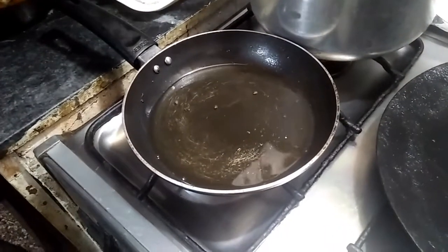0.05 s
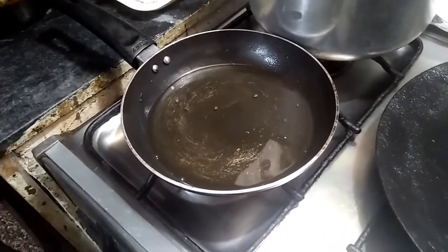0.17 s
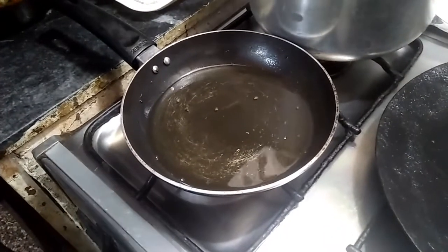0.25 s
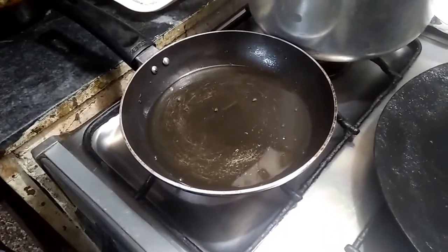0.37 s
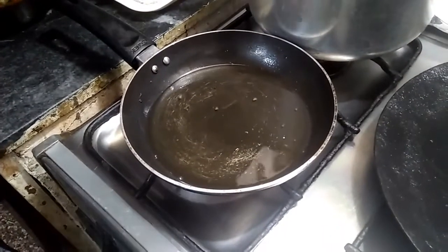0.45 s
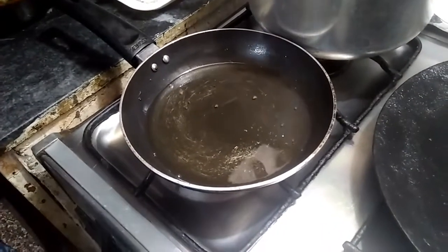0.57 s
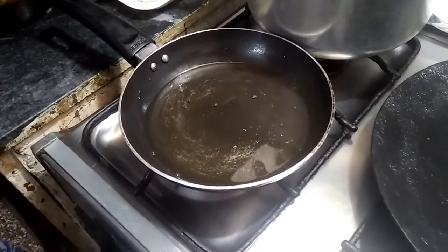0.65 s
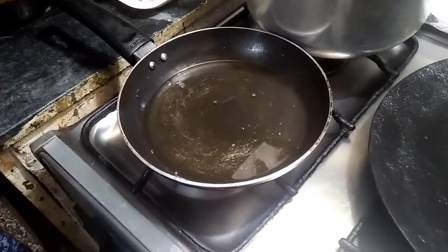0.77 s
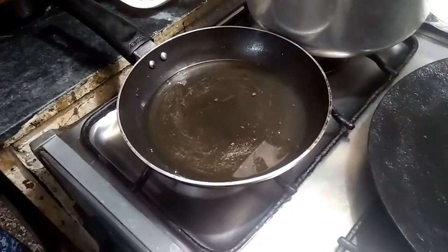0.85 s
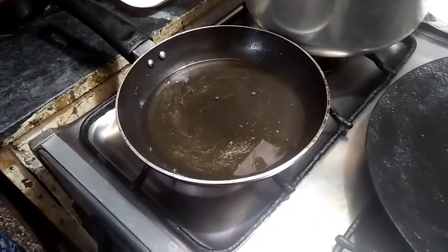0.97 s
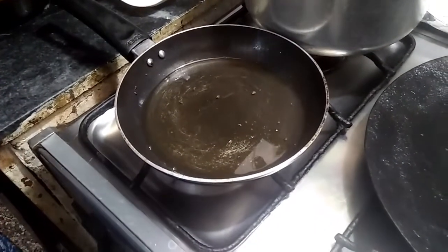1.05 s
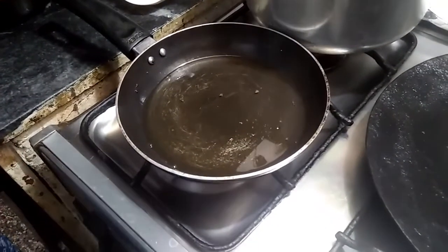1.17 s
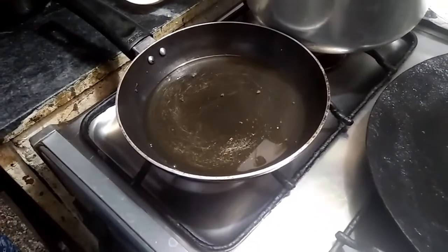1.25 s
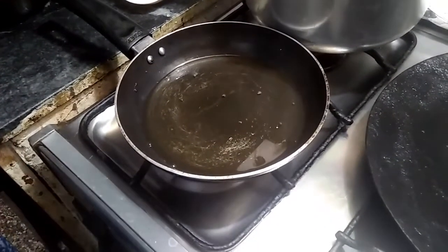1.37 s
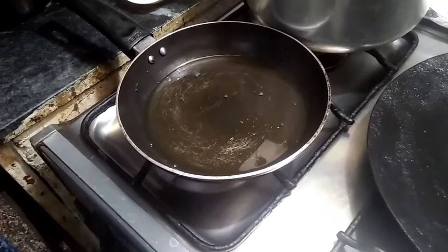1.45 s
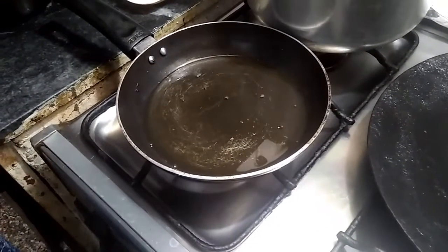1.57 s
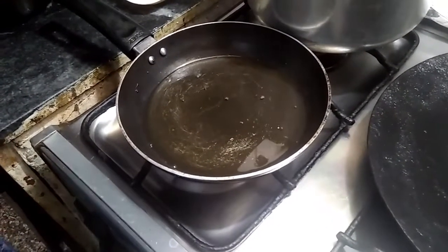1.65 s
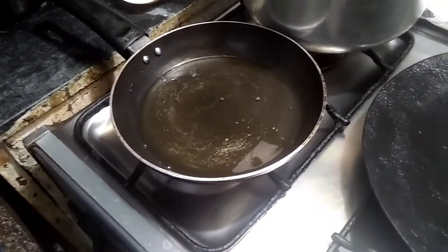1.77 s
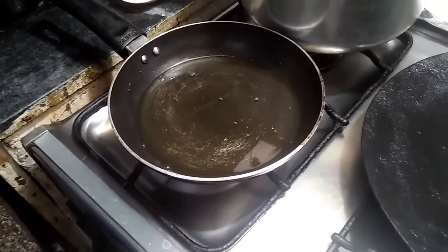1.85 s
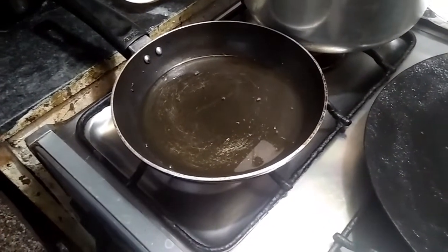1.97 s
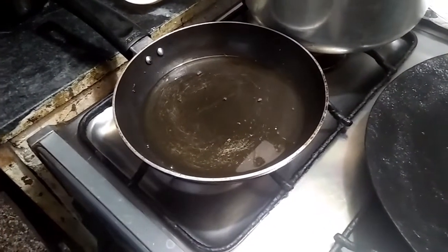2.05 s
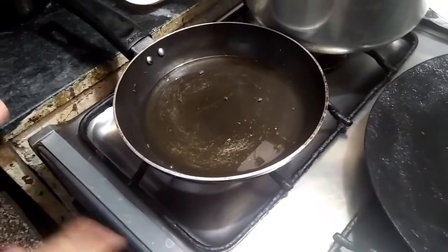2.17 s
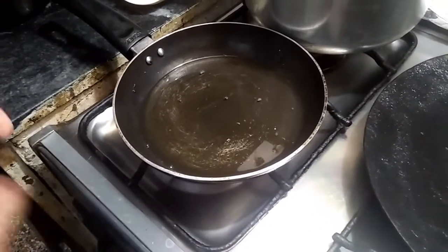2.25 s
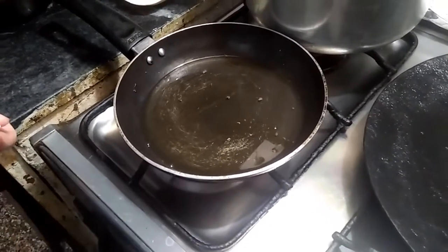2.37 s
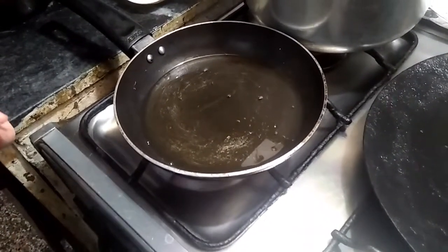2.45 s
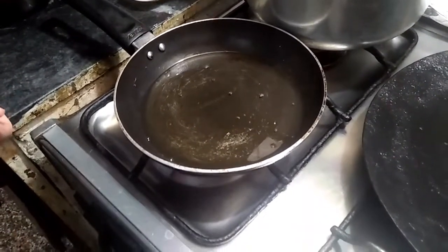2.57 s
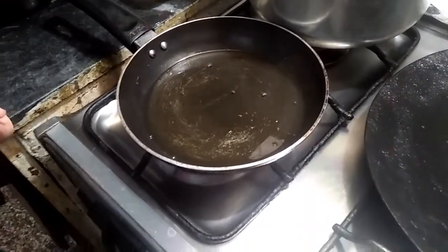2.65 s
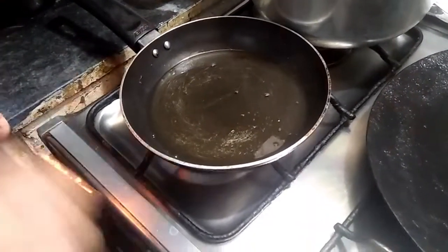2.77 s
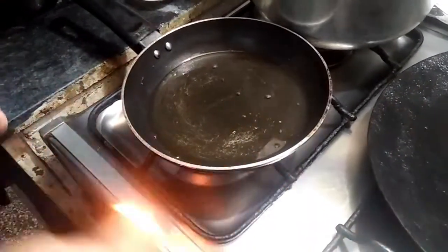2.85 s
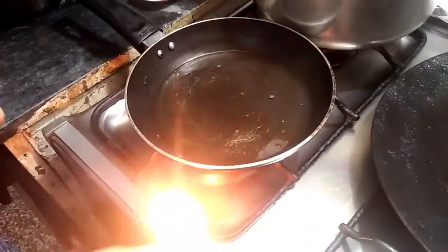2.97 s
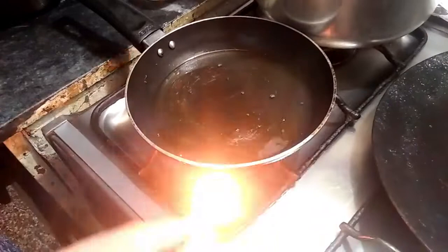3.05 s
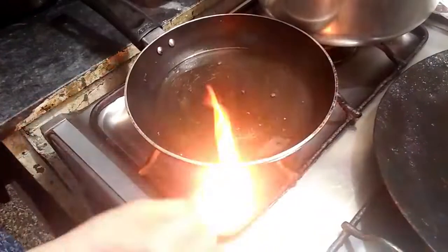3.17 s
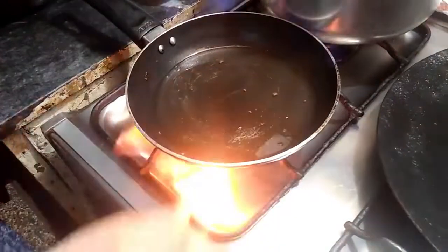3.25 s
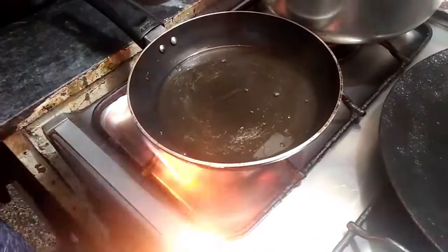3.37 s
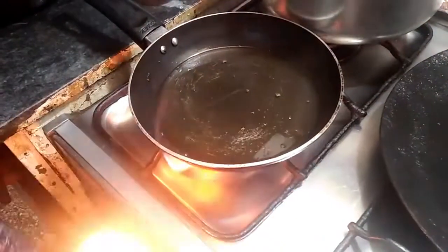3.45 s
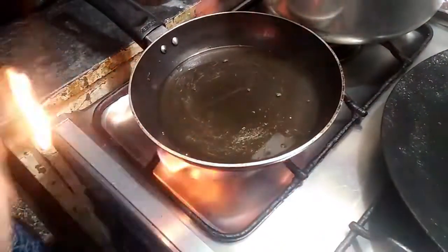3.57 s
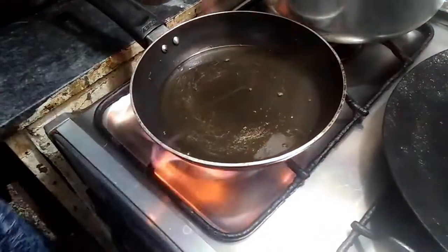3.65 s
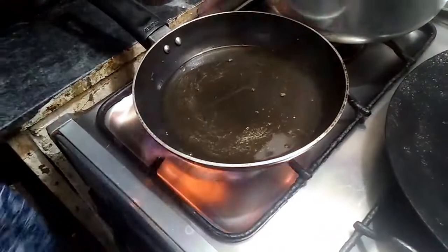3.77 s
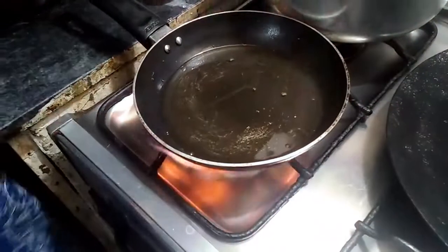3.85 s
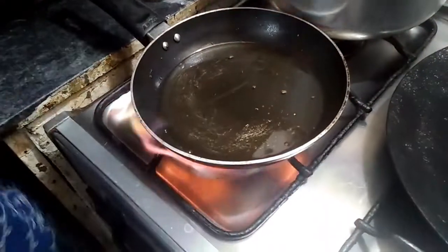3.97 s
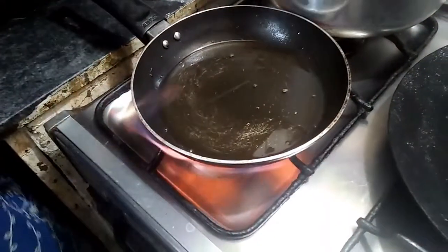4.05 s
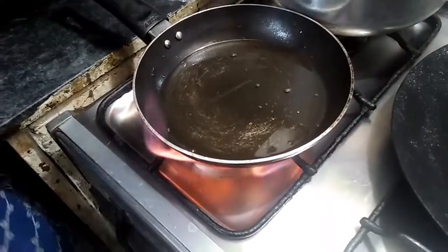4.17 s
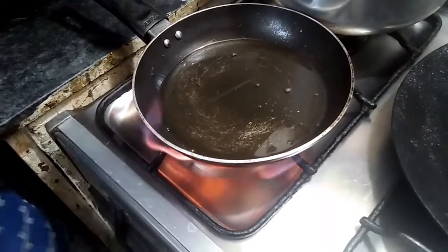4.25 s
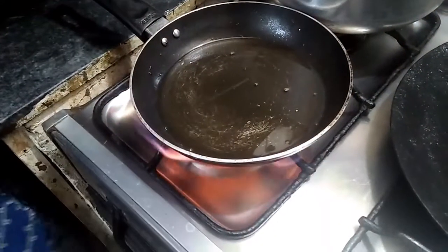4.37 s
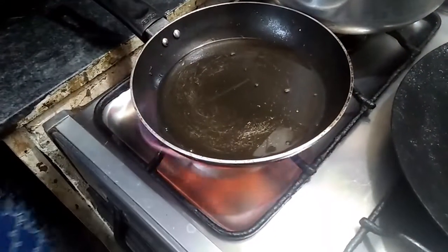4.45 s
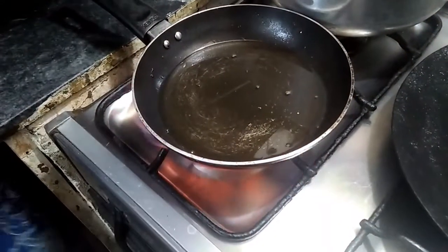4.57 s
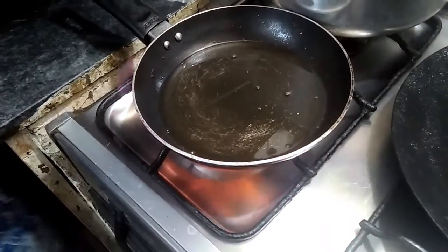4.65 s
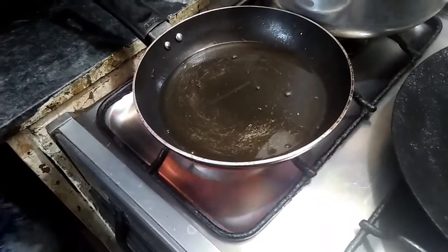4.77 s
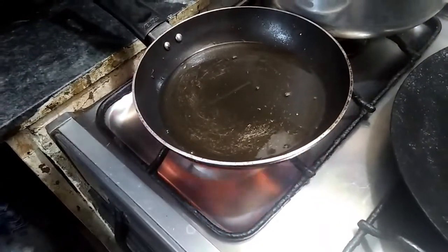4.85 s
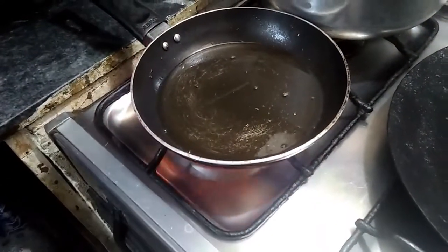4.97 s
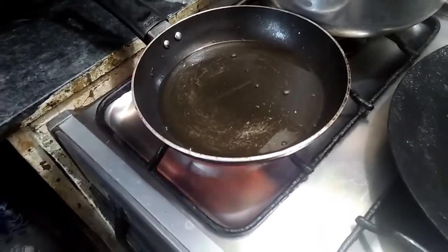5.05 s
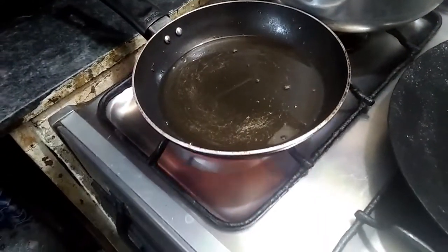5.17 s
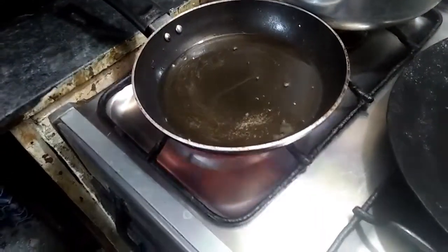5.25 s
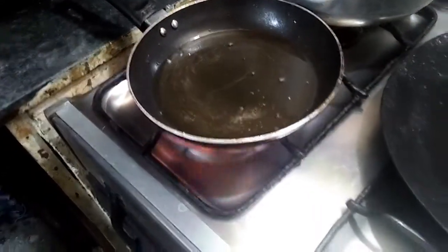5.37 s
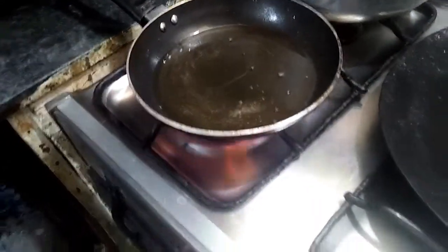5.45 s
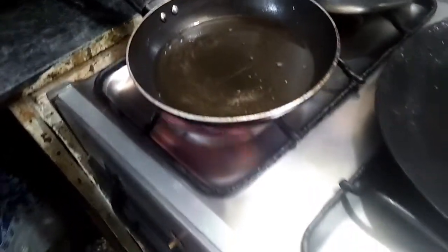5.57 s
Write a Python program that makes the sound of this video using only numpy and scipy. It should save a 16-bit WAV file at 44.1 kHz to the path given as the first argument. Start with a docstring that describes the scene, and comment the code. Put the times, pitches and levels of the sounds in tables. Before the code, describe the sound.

Matches clatter lightly in a card box, then a pause with faint dull bumps. Gas rushes from the burner, a match snaps sharply along the striker and sputters, and a short, boomy ignition puff dominates. Afterwards only quiet fluttering flame, faint hiss, gritty footsteps and low room hum remain, heard by a close microphone in a small kitchen.

```python
"""Small kitchen, microphone just above the stove: a gas burner is lit with a match under a frying pan.
A matchbox slides and rattles (slipping grains, ringing contacts), and dull bumps come from knob and stove.
Gas hisses through a resonant mixing tube, a match judders along the striker and its head fizzes.
The gas catches with a whump of low modes and burns on as fluttering noise.
Soles scuff and tap on the floor; faint room air and a low hum lie beneath."""
import sys
import numpy as np
from scipy import signal
from scipy.fft import rfft, irfft
from scipy.io import wavfile
from scipy.ndimage import uniform_filter1d, map_coordinates

SR = 44100
rng = np.random.default_rng(int(sys.argv[2]) if len(sys.argv) > 2 else 0)


def unload_wav(signal):
    """Save mono or channel-first audio to the path in sys.argv[1] as 16-bit WAV at rate SR, clipped to [-1, 1]."""
    wavfile.write(
        sys.argv[1],
        SR,
        np.round(np.clip(np.atleast_2d(signal).T, -1, 1) * 32767).astype(np.int16),
    )


N = 247401
TIME = np.arange(N) / SR

# puffs of igniting gas and match flame: t/s, level/dB, rise/s, decay/s, flame front over low modes/dB
PUFFS = [(2.857, -45.5, 0.0087, 0.042, 6.5), (3.229, -42, 0.005, 0.027, -10),
         (3.319, -20, 0.049, 0.017, -6.5), (3.376, -27, 0.012, 0.021, -6),
         (3.42, -46.5, 0.052, 0.074, -1.5)]
# low modes of the space under the pan and of the room: f/Hz, relative level/dB
WHUMP_MODES = [(50, -4), (65, 6.5), (96, -5), (124, 3), (147, 3.5), (192, -7), (280, -5.5)]
# spectrum of the flame front: f/Hz, relative level per Hz/dB
FRONT_SPECTRUM = [(170, -12), (270, -2), (360, -8), (450, -3), (650, -4), (850, -10), (1050, -6),
                  (1250, -14.5), (1500, -8), (1900, -32), (3000, -29.5), (6000, -41.5)]
# spectrum of the steady flames: f/Hz, relative level per Hz/dB
FLAME_SPECTRUM = [(24, -50), (40, 4), (149, -9), (232, -15.5), (312, -20), (371, -33), (567, 6),
                  (1030, -4.5), (1200, -2.5), (1700, -1), (2210, -74), (3740, -120)]


def fire():
    """Pooled gas burns in expanding puffs that drive low modes, then the ring of flames flutters on."""
    low = np.zeros(N)
    for hz, db in WHUMP_MODES:
        # turbulence keeps shifting the phase of each mode
        phase = 2 * np.pi * (hz * TIME + rng.random()) + 0.66 * walk(25)
        low += undb(db) * np.sin(phase)
    low = unit(low)
    front = colour(grains(rate=6400, spread_db=7.0), FRONT_SPECTRUM)
    puffs = np.zeros(N)
    for start, db, rise, decay, front_db in PUFFS:
        puffs += undb(db) * burst(start, rise, decay) * (low + undb(front_db) * front)
    flutter = undb(-64.5 + 1.5 * walk(20))
    lit = np.clip((TIME - 3.36) / 0.1, 0, 1)
    return puffs + colour(noise(), FLAME_SPECTRUM) * flutter * lit


# resonances of the burner's mixing tube: f/Hz, nominal width/Hz, relative level/dB
TUBE = [(140, 39, -23.5), (301.4, 50, -21.5), (494, 62, -27.5), (692, 220, -15), (978, 103, -8),
        (1373, 100, -15.5), (1847, 186, -2), (2073, 119, 1.5), (2230, 120, -4), (2530, 143, -8.5),
        (2796, 170, -12.5), (3229, 130, -14.5), (6010, 720, -31), (8440, 760, -28.5), (9800, 2600, -37),
        (11680, 130, -26.5), (13000, 3400, -47.5)]
VALVE_S, VALVE_OPENING_S = 1.862, 0.047
# the hiss holds with a slight sag, then sinks to a low level after the match is struck
JET_DB, JET_SAG_DB_PER_S = -37.35, 1.57
JET_SINKS_S, JET_SINKING_S, JET_LOW_DB = 2.96, 0.57, -55.35


def gas():
    """The jet's turbulence rings the mixing tube; the hiss sinks to a low level after the match is struck."""
    darker = np.clip((TIME - 3.35) / 0.5, 0, 1)  # the balance of the hiss tilts towards the low resonances
    tube = np.zeros(N)
    for hz, width, db in TUBE:
        tilt_db = -3 * (hz > 4000) + 4.8 * (hz < 1500)
        gain_db = db + 0.23 * walk(23) + darker * tilt_db
        tube += undb(gain_db) * resonate(noise(), hz, width)
    valve = np.clip((TIME - VALVE_S) / VALVE_OPENING_S, 0, 1) ** 1.23
    sunk = np.clip((TIME - JET_SINKS_S) / JET_SINKING_S, 0, 1)
    open_db = JET_DB - JET_SAG_DB_PER_S * (TIME - VALVE_S)
    jet_db = (1 - sunk) * open_db + sunk * JET_LOW_DB
    return unit(tube) * valve * undb(jet_db + 0.5 * walk(25))


# burning match head: t/s, fizz level/dB
FIZZ = [(2.92, -42), (3.022, -53), (3.176, -49.5), (3.284, -57), (3.396, -47), (3.404, -56), (3.464, -63.5),
        (3.498, -54.5), (3.752, -60.5), (3.97, -80.5)]
# spectrum of the sputtering head: f/Hz, relative level per Hz/dB
FLARE_SPECTRUM = [(6500, -12), (7600, -7.5), (9000, 1.5), (10200, 0), (11300, -2), (12500, -7.5),
                  (14500, -15)]
# spectrum of the hot gas rushing out: f/Hz, relative level per Hz/dB
RUSH_SPECTRUM = [(4000, -14), (4600, 5), (5100, 3), (6300, 2), (7200, 5.5)]
# hot gas against the fizz: strongest when the whole head is alight
RUSH_DB, RUSH_PEAK_S, RUSH_FADE_DB_PER_S = -3, 3.19, 19.5


def match_flare():
    """The head burns off in a sputtering fizz while jets of hot gas rush from it."""
    fizz = colour(grains(rate=22000, spread_db=2.0), FLARE_SPECTRUM) * undb(1.6 * walk(44))
    rush_db = RUSH_DB - RUSH_FADE_DB_PER_S * np.abs(TIME - RUSH_PEAK_S) + 2.2 * walk(40.2)
    rush = colour(noise(), RUSH_SPECTRUM) * undb(rush_db)
    return shifting((fizz + rush) * fader(FIZZ), share=0.29, lag_s=0.0006, rate=11.0)


# modes of the gripped box and the stick: f/Hz, level/dB, t60/s
GRIPPED_MODES = [(1070, -19.5, 0.013), (1350, -8.5, 0.041), (1740, -4, 0.033), (1757, 4, 0.021),
                 (2014, 3, 0.025), (2740, -5.5, 0.013), (9200, -24.5, .035), (9540, -15, 0.085)]
# spectrum of the grit sprayed off the striker: f/Hz, relative level per Hz/dB
STRIKER_SPECTRUM = [(1000, -1), (2500, -5), (4000, -11.5), (6000, -6.5), (7700, 0.5), (8500, 1.5),
                    (9500, 6.5), (10500, -5), (12500, -3), (14500, -2)]
STRIKE_S, SLIP_GAP_S, BITE_AFTER_S = 2.8502, 0.0025, 0.0062  # the hardest bite follows the first touch
KNOCK_DB, KNOCK_RISE_DB_PER_S, KNOCK_FALL_DB_PER_S = -8.5, 600, 2600
SPRAY_DB, SPRAY_FALL_DB_PER_S = -17.5, 650
CRACK_DB, CRACK_DECAY_S = -13.5, 0.007  # card crushed by the hardest bite


def strike():
    """The match head judders across the striker; each slip knocks the gripped box and sprays grit."""
    knocks, spray = np.zeros(N), np.zeros(N)
    for k, jitter in enumerate(rng.uniform(-1, 1, size=10)):
        after = SLIP_GAP_S * (k + 0.12 * jitter)
        rising_db = KNOCK_RISE_DB_PER_S * (BITE_AFTER_S - after)
        falling_db = KNOCK_FALL_DB_PER_S * (after - BITE_AFTER_S)
        knocks[int((STRIKE_S + after) * SR)] += undb(KNOCK_DB - max(rising_db, falling_db))
        spray_gain = undb(SPRAY_DB - SPRAY_FALL_DB_PER_S * after)
        spray += spray_gain * burst(STRIKE_S + after, rise=0.00021, decay=0.0039)
    age = TIME[:SR // 8]
    ring = np.zeros(len(age))
    for hz, db, t60 in GRIPPED_MODES:
        ring += undb(db) * np.sin(2 * np.pi * hz * age) * np.exp(-np.log(1000) * age / t60)
    ring *= 1 - np.exp(-age / 0.0021)  # card takes a moment to get moving
    crack = undb(CRACK_DB) * burst(STRIKE_S, BITE_AFTER_S, CRACK_DECAY_S) * box_ring(noise())
    return signal.fftconvolve(knocks, ring)[:N] + crack + spray * colour(noise(), STRIKER_SPECTRUM)


# resonances of the matchbox: f/Hz, nominal width/Hz, relative level/dB
BOX = [(1207, 156, -2.5), (1680, 306, -2.5), (1895, 315, -1), (2384, 180, -6)]


def box_ring(slips):
    """The hollow matchbox resonates when shaken by slips."""
    return unit(sum(undb(db) * resonate(slips, hz, width) for hz, width, db in BOX))


# pushes of the matchbox tray: t/s, rise/s, hold/s, t60/s, rasp level/dB, box resonance level/dB
SLIDES = [(0.075, 0.028, 0.11, .1, -58.5, -56), (0.172, 0.01, 0.11, 0.22, -43, -43.5),
          (0.45, 0.019, .05, .1, -65, -60.5), (0.520, 0.013, 0.039, 0.12, -50, -49.5),
          (0.696, 0.03, 0.069, 0.14, -42.5, -47), (0.812, 0.011, 0.033, .13, -54.5, -46),
          (2.095, 0.047, .06, 0.34, -42.5, -36.5)]
# matches knocking in their box: t/s, level/dB, treble over knock/dB, length/s, ring f/Hz
RATTLES = [(0.055, -53.5, -13, .004, 1730), (0.144, -45.5, -12, 0.0045, 1950),
           (0.165, -41, -17, 0.0043, 1920), (0.178, -32.5, -12, .004, 1980),
           (0.187, -33.5, -0.5, .007, 1920), (0.233, -47, 9, 0.0037, 1900),
           (0.2575, -32.5, -12.5, 0.0078, 2010), (0.297, -40, -8, .011, 2210),
           (0.370, -47.5, -13, 0.0066, 2070), (0.530, -47.5, 0, 0.015, 1810),
           (0.579, -35.5, -14, .007, 1890), (0.586, -34, -9, .005, 2470), (0.594, -37.5, -18, .005, 2250),
           (0.702, -45, -14, .006, 2100), (0.7695, -35, -9.5, .011, 1866), (2.168, -34, -1.5, .002, 1720),
           (2.206, -30, -7.5, .002, 2000)]
# spectrum of rasping card: f/Hz, relative level per Hz/dB
RASP_SPECTRUM = [(2400, -13.5), (3200, -8.5), (3700, -10.5), (4400, -4.5), (5200, -7), (6000, -7.5),
                 (7500, -5), (9500, -0.5), (11000, -5.5), (12500, -12.5), (14500, -16)]
TRAY_SAG_DB_PER_S = 24  # a push loses force as it goes


def matchbox():
    """The card tray slides in its sleeve by tiny slips and the matches knock inside."""
    slips = shifting(grains(rate=6000, spread_db=1.0), share=0.85, lag_s=0.0014, rate=12)
    sliding = rubbing(SLIDES, colour(slips, RASP_SPECTRUM), box_ring(slips), TRAY_SAG_DB_PER_S)
    rattling = contacts(RATTLES, box_ring(noise()), colour(noise(), RASP_SPECTRUM),
                        release=0.0025, ring_db=4.5, ring_width_hz=190)
    return sliding + rattling


# dull bumps of knob and stove body: t/s, level/dB, decay/s
BUMPS = [(1.409, -58.5, 0.048), (1.495, -67, 0.018), (1.655, -43.5, 0.057), (2.079, -47.5, 0.0088),
         (2.265, -52, .01), (3.961, -47.5, 0.024)]
# spectrum of the stove body: f/Hz, relative level per Hz/dB
BODY_SPECTRUM = [(40, -8), (70, -5), (145, -0.5), (220, -14), (290, 2), (400, -8), (560, -4), (800, -8.5),
                 (1450, -16), (1900, -29.5), (4000, -53)]


def stove_bumps():
    """The knob and the hand on it shake the sheet-metal body."""
    shaking = sum(undb(db) * burst(start, 0.005, decay) for start, db, decay in BUMPS)
    return colour(noise(), BODY_SPECTRUM) * shaking


# soles scuffing the floor: t/s, rise/s, hold/s, t60/s, grit level/dB, sole level/dB
SCUFFS = [(4.005, 0.024, 0.057, .2, -56.5, -49.5), (4.085, 0.013, 0.021, 0.62, -51.5, -43.5),
          (4.315, 0.0083, 0.0082, 0.33, -61, -48), (4.36, 0.11, 0.022, 0.15, -53, -51),
          (4.72, 0.11, 0.14, 0.29, -48, -47.5), (5.11, 0.014, 0.013, 0.23, -52.5, -46.5),
          (5.305, 0.033, 0.019, .3, -62, -48)]
# taps of soles and crushed grit: t/s, level/dB, treble over knock/dB, length/s, ring f/Hz
STEPS = [(3.572, -43.5, -12, .004, 1470), (4.092, -43.5, 0, 0.0088, 1580), (4.106, -38, -10, .015, 1410),
         (4.207, -49, 0, 0.0048, 1500), (4.324, -45.5, -14, .013, 1600), (4.445, -55.5, 4, .003, 1400),
         (4.490, -49, 3, 0.0055, 1345), (4.835, -46, -10, .032, 1480), (4.915, -45.5, -0.5, .03, 790),
         (4.954, -37, -23, 0.014, 1546), (5.117, -40.5, -18, .008, 1500)]
# spectrum of grit: f/Hz, relative level per Hz/dB
GRIT_SPECTRUM = [(2500, -27), (4000, -18.5), (5200, -12), (6000, -7), (6600, -1.5), (7200, -4.5), (8800, 3),
                 (9900, 2.5), (11000, -5.5), (12500, -6.5), (14500, -18)]
# spectrum of the sole: f/Hz, relative level per Hz/dB
SOLE_SPECTRUM = [(300, -32), (550, -12), (750, -6.5), (1050, -11), (1400, 1), (1650, -5.5), (2000, -1.5),
                 (2700, -11.5), (3500, -29), (5000, -35.5)]


def feet():
    """Soles drag over grit by tiny slips and tap down."""
    slips = shifting(grains(rate=6000, spread_db=1.5), share=0.42, lag_s=0.000674, rate=9)
    dragging = rubbing(SCUFFS, colour(slips, GRIT_SPECTRUM), colour(slips, SOLE_SPECTRUM))
    tapping = contacts(STEPS, colour(noise(), SOLE_SPECTRUM), colour(noise(), GRIT_SPECTRUM),
                       release=0.0064, ring_db=3.0, ring_width_hz=160)
    return dragging + tapping


# spectrum of the room air: f/Hz, relative level per Hz/dB
ROOM_SPECTRUM = [(15, -28), (25, -5.5), (54, -3), (118, -13.5), (150, -7), (231, -20), (301, -4),
                 (354, -19.5), (438, -1), (529, -14.5), (691, -9.5), (749, -8.5), (1910, -14),
                 (2430, -23.5), (15000, -35.5)]
# steady hum in the kitchen: f/Hz, level/dB
HUM = [(48.4, -77), (145.3, -74)]
ROOM_DB = -64


def background():
    """Faint murky room air as coloured noise, and a low hum of slightly wavering sines."""
    hum = np.zeros(N)
    for hz, db in HUM:
        tone = np.sqrt(2) * np.sin(2 * np.pi * hz * TIME + 0.57 * walk(0.73))
        hum += undb(db + 1.1 * walk(3.16)) * tone
    return colour(noise(), ROOM_SPECTRUM) * undb(ROOM_DB + 0.27 * walk(17)) + hum


def contacts(rows, body, treble, release, ring_db, ring_width_hz):
    """Short scraping contacts shake a body, ring at a pitch set by the spot touched, and spray treble."""
    out = np.zeros(N)
    for start, db, treble_db, length, hz in rows:
        first, count = int(start * SR), int((length + 6 * release) * SR)
        here = slice(first, first + count)
        age = np.arange(count) / SR
        press = np.minimum(age * 2000, 1) * np.exp(-np.maximum(age - length, 0) / release)
        press *= 1 + undb(-1.5) * np.exp(-age / 0.00079)  # the first touch is the hardest
        ring = resonate(rng.standard_normal(SR // 2), hz, ring_width_hz)[-count:]
        knock = unit(unit(press * body[here]) + undb(ring_db) * unit(press * ring))
        spray = unit(press * treble[here])
        force = np.sqrt(np.mean(press ** 2))
        out[here] += undb(db) * force * (knock + undb(treble_db) * spray)
    return out


def stroke(start, rise, hold, t60, sag_db_per_s):
    """One rubbing movement: it speeds up, holds or sags a little, and runs out."""
    age = np.maximum(TIME - start, 0)
    held = np.maximum(age - rise, 0)
    sag = undb(-sag_db_per_s * np.minimum(held, hold))
    run_out = np.exp(-np.log(1000) * np.maximum(held - hold, 0) / t60)
    return np.minimum(age / rise, 1) ** 2 * sag * run_out


def rubbing(rows, treble, body, sag_db_per_s=0):
    """Strokes that each rasp in the treble and shake a body."""
    out = np.zeros(N)
    for start, rise, hold, t60, treble_db, body_db in rows:
        rubbed = undb(treble_db) * treble + undb(body_db) * body
        out += stroke(start, rise, hold, t60, sag_db_per_s) * rubbed
    return out


def grains(rate, spread_db):
    """Tiny slips of uneven size, rate a second, rms 1."""
    slipping = rng.random(N) < rate / SR
    size_db = spread_db * np.minimum(rng.exponential(size=N), 4)
    return unit(slipping * noise() * undb(size_db))


def burst(start, rise, decay):
    """Swell to 1 and die away."""
    age = np.maximum(TIME - start, 0)
    return np.minimum(age / rise, 1) ** 2 * np.exp(-np.maximum(age - rise, 0) / decay)


def shifting(x, share, lag_s, rate):
    """A reflection off a moving surface close by keeps changing the colour."""
    lag = lag_s * np.exp(0.265 * walk(rate))
    return (x + share * np.interp(TIME - lag, TIME, x)) / np.hypot(1, share)


def resonate(x, hz, width):
    """A lossy resonance with steep skirts and gain 1 at its centre."""
    q = min(hz / (1.55 * width), 18)  # two equal passes narrow the peak, so each is wider
    b, a = signal.iirpeak(hz, q, fs=SR)
    return signal.lfilter(b, a, signal.lfilter(b, a, x + 1e-18))


def colour(x, points):
    """Causal minimum-phase filter through (Hz, dB) points that keeps the power of white noise."""
    hz, db = np.transpose(points)
    size = 8192
    octave = np.log2(np.maximum(np.fft.rfftfreq(size, 1 / SR), 1))
    below = np.maximum(np.log2(hz[0]) - octave, 0)
    above = np.maximum(octave - np.log2(hz[-1]), 0)
    # beyond the end points the curve falls 18 dB an octave, for three octaves
    curve_db = np.interp(octave, np.log2(hz), db) - 18 * np.minimum(below + above, 3)
    cepstrum = irfft(np.log(undb(curve_db)))
    cepstrum[1:size // 2] *= 2  # folding the cepstrum makes the filter causal
    cepstrum[size // 2 + 1:] = 0
    response = irfft(np.exp(rfft(cepstrum)))
    return signal.fftconvolve(x, response / np.linalg.norm(response))[:N]


def fader(rows):
    """Gain along a dB curve, silent outside it."""
    t, db = np.transpose(rows)
    return uniform_filter1d(undb(np.interp(TIME, t, db, left=-140, right=-140)), size=128)


def walk(rate):
    """Smooth random wander with a spread near 1, rate knots a second."""
    knots = rng.standard_normal(2048)
    return map_coordinates(knots, [TIME * rate], order=2, mode="wrap")


def noise():
    """White turbulence."""
    return rng.standard_normal(N)


def unit(x):
    """Scale to rms 1."""
    return x / np.sqrt(np.mean(x ** 2))


def undb(db):
    """Decibels to gain."""
    return 10 ** (np.asarray(db) / 20)


def kitchen(x, wet_db, t60, treble_t60):
    """Hard walls close by return a short tail whose treble dies sooner."""
    age = TIME[:SR * 2 // 3]
    scatter = rng.standard_normal(len(age)) * np.clip((age - 0.004) / 0.0024, 0, 1)
    low = signal.sosfilt(signal.butter(2, 4000, fs=SR, output="sos"), scatter)
    high = signal.sosfilt(signal.butter(2, 4000, "high", fs=SR, output="sos"), scatter)
    # subtracting the high band keeps the two in phase at the crossover
    tail = low * np.exp(-np.log(1000) * age / t60) - high * np.exp(-np.log(1000) * age / treble_t60)
    return x + undb(wet_db) * signal.fftconvolve(x, tail / np.linalg.norm(tail))[:N]


def ports(x, side_db):
    """Two close microphone ports: only treble, glancing off metal and tiles, differs between them."""
    age = TIME[:SR // 12]
    glints = rng.standard_normal(len(age)) * np.exp(-age / 0.02)
    side = signal.fftconvolve(x, glints / np.linalg.norm(glints))[:N]
    treble_only = signal.ellip(8, 0.5, 70, 4000, "high", fs=SR, output="sos")
    side = undb(side_db) * signal.sosfilt(treble_only, side)
    return np.array([x + side, x - side])


def scene():
    """Stove, hands and floor each sound with their own kitchen tail, over the background."""
    stove = kitchen(fire() + gas() + stove_bumps(), wet_db=-10, t60=0.31, treble_t60=0.1)
    hands = kitchen(match_flare() + strike() + matchbox(), wet_db=-10, t60=0.37, treble_t60=0.2)
    floor = kitchen(feet(), wet_db=-10.5, t60=0.3, treble_t60=0.11)
    return ports(stove + hands + floor + background(), side_db=-11.5)


def record(dry):
    """The microphone chain clips at full scale and cuts the top above 14.2 kHz."""
    top_cut = signal.ellip(10, 0.2, 80, 14200, fs=SR, output="sos")
    return signal.sosfilt(top_cut, np.clip(dry, -1, 1))


dry = scene()
out = record(dry)
unload_wav(out)
```